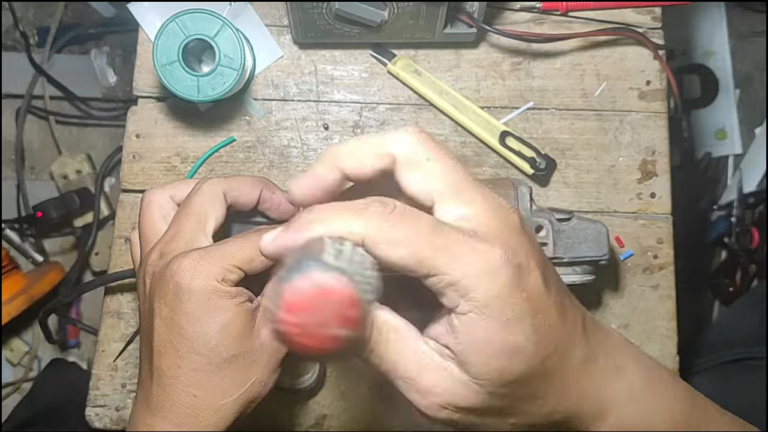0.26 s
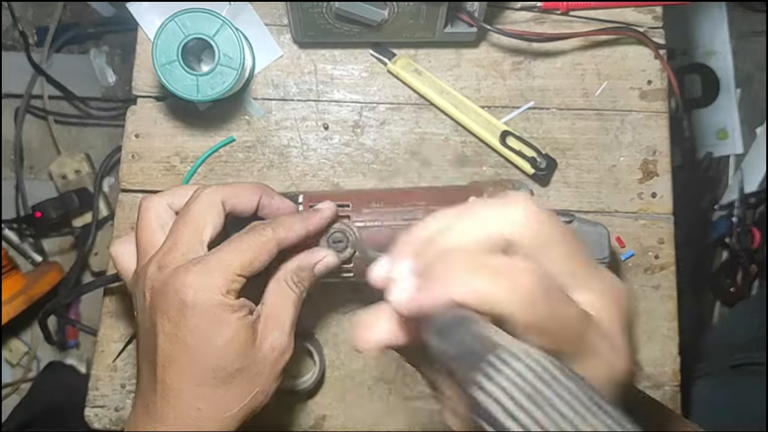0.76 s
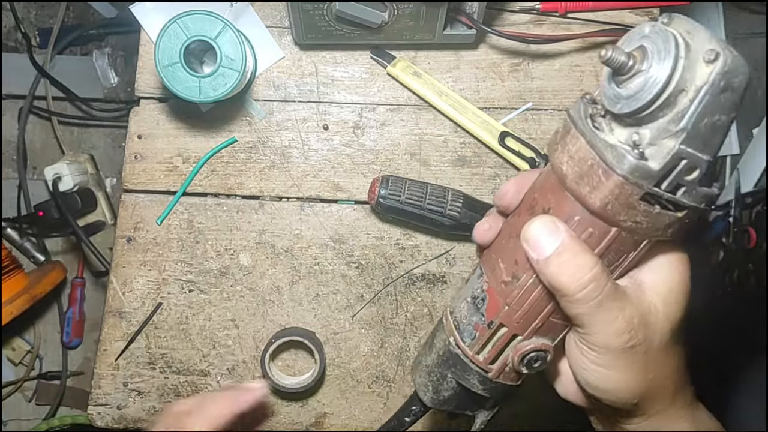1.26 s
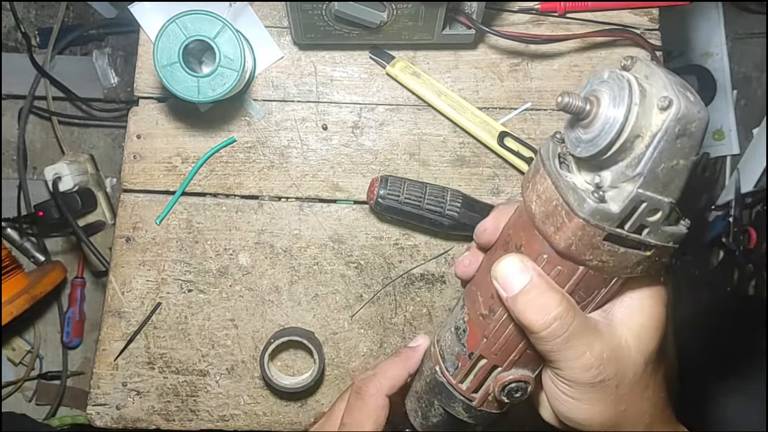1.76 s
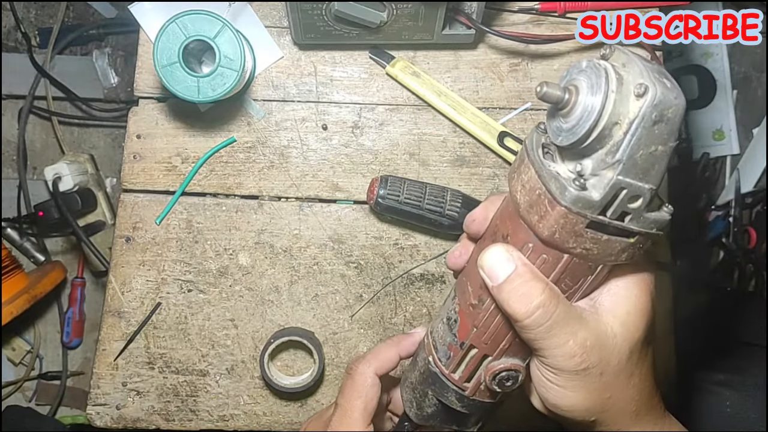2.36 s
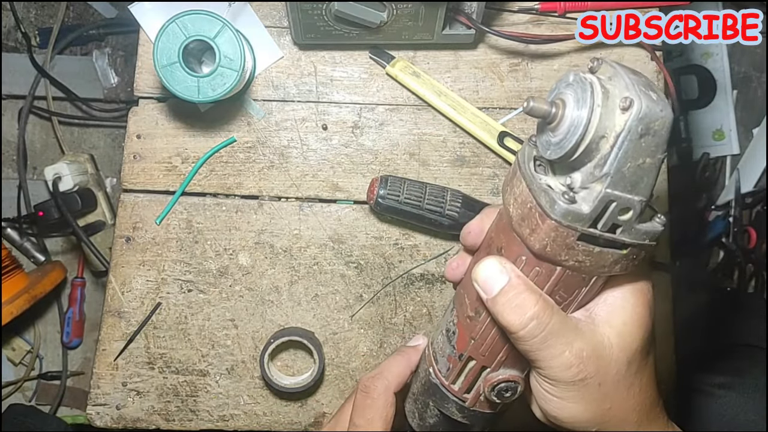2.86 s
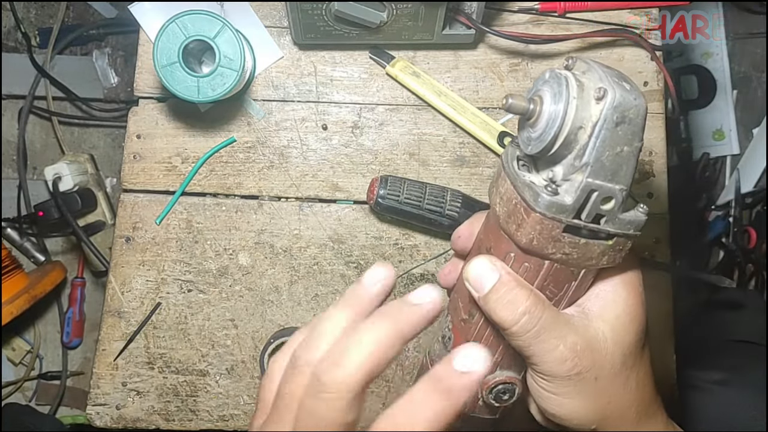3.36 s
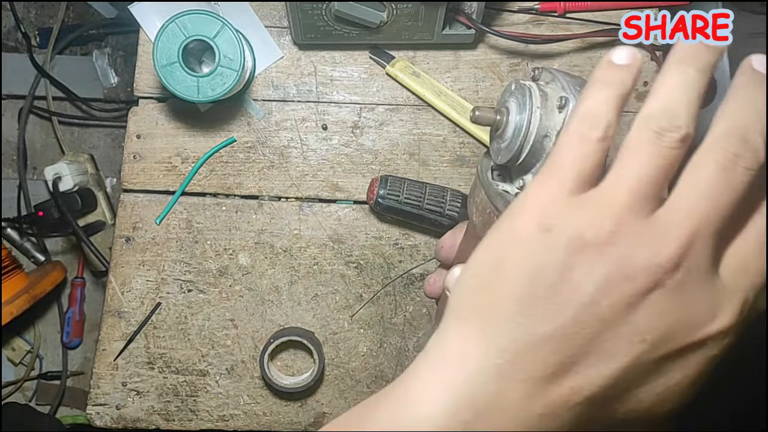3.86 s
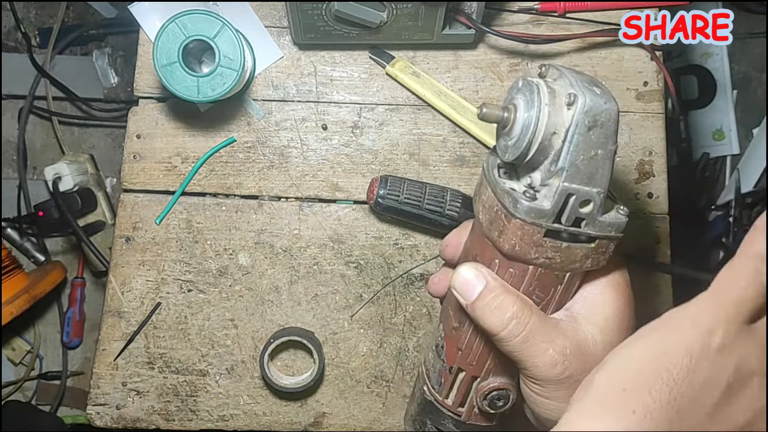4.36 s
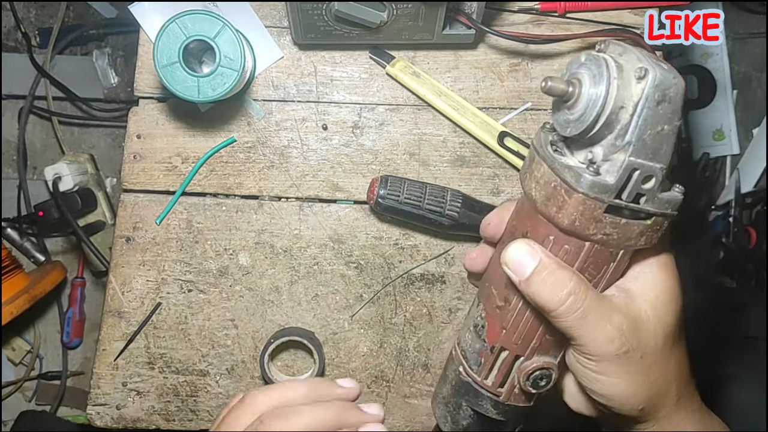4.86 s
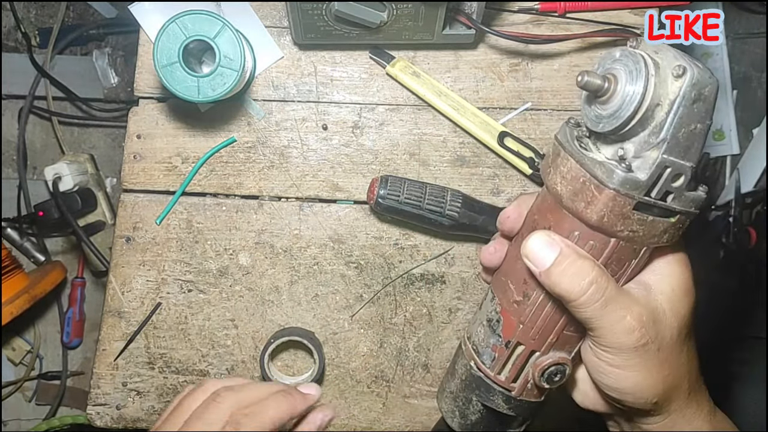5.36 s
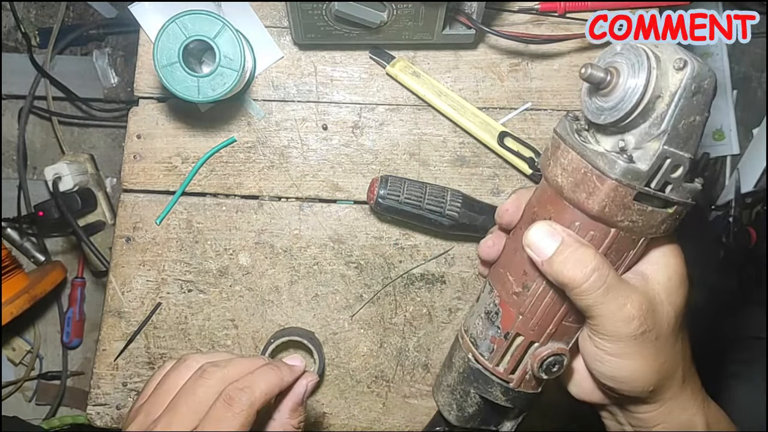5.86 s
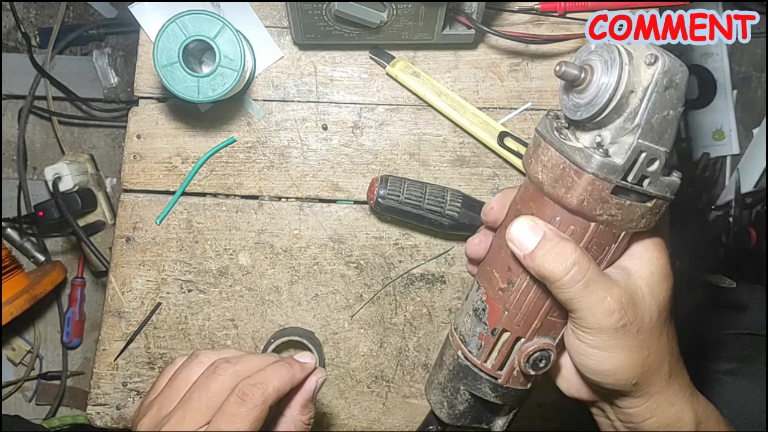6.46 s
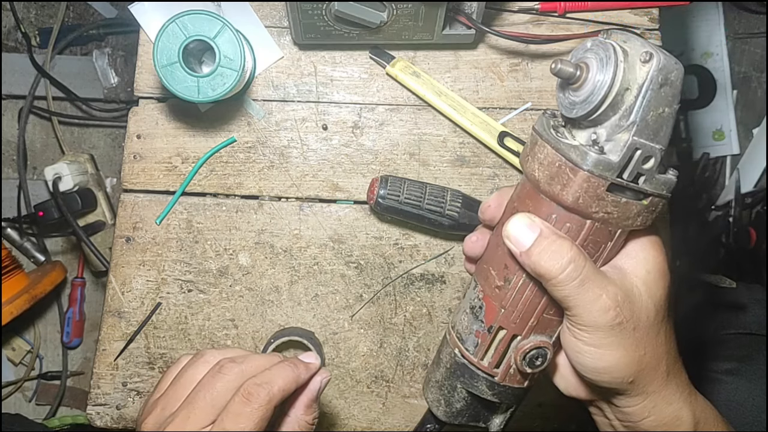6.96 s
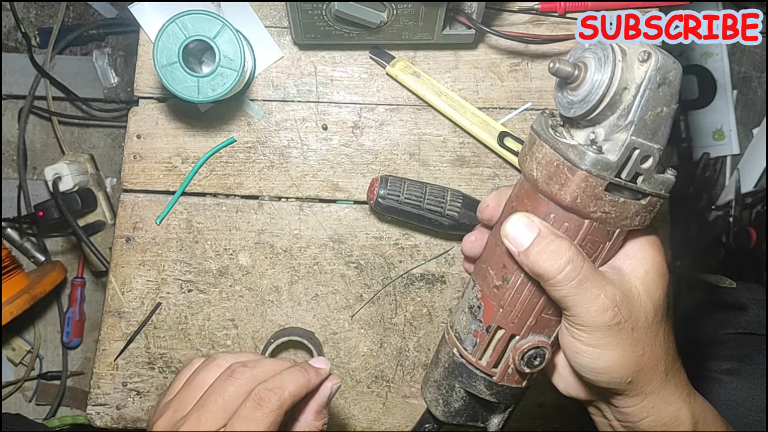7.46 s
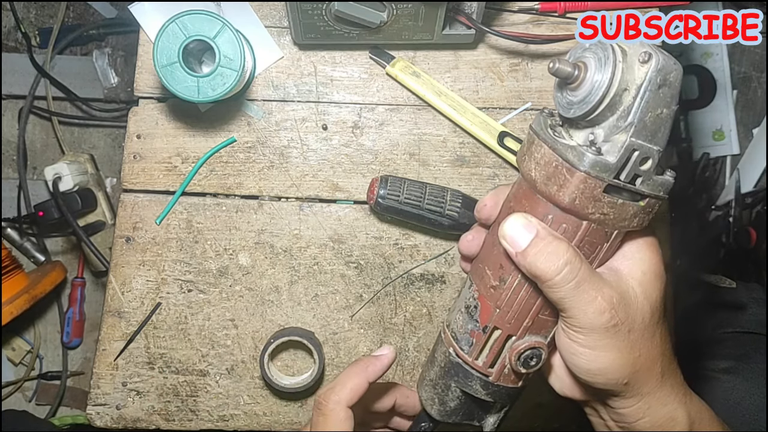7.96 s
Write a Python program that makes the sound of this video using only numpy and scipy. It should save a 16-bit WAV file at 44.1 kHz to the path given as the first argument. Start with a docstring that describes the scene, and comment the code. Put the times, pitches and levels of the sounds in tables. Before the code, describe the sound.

Distant rustling and soft hum at a workbench, suddenly quieter after one second. Then a bare angle grinder starts instantly, near the single microphone, with bright air hiss, brush fizz and gear rattle. Its rough whine sweeps up, slides down briefly, rises again and slowly settles. As the tool is turned, different overtones swell and fade; the noise turns hollow and duller while a hand passes. It never switches off.

```python
"""Workshop: a hand-held angle grinder without a disc is switched on above a bench, near one microphone.
The armature spins up, sags and climbs again; its multiples, rough sines locked to its turns, whine and swell
as the tool is turned in the hand. Brushes and cooling air hiss: filtered noise pulsed once a turn.
Before the start only quiet bustle, drone and squeaks, whose level fades and drops in one step."""
import sys
import numpy as np
from scipy import signal
from scipy.fft import rfft, irfft, next_fast_len
from scipy.io import wavfile
from scipy.ndimage import uniform_filter1d

SR = 44100
rng = np.random.default_rng(int(sys.argv[2]) if len(sys.argv) > 2 else 0)


def master_out(mix):
    """Clip the mix to full scale and print it as 16-bit PCM to the path in sys.argv[1]."""
    frames = np.transpose(np.atleast_2d(mix))
    ceiling = np.clip(frames, -1, 1)
    pcm = np.round(ceiling * 32767).astype(np.int16)
    wavfile.write(sys.argv[1], SR, pcm)


def volts_from_decibels(level):
    """Turn decibel levels (scalar or array-like) into linear amplitude factors."""
    exponent = np.asarray(level, float) / 20
    return 10 ** exponent


N = 362061
TIME = np.arange(N) / SR
START_S = 1.8725

# noise as the vents turn towards or away: (t/s, vent hiss level/dB, brush fizz level/dB, gear rush level/dB)
AIR = [(1.9, -29, -30, -36.5), (2.05, -36, -30.5, -40), (2.3, -30.5, -33.5, -36.5), (2.9, -34, -31.5, -39),
       (3.2, -31.5, -35, -36), (3.45, -35, -34.5, -39.5), (3.62, -34.5, -28.5, -36.5),
       (4.1, -40.5, -31, -36.5), (4.5, -45.5, -37, -42.5), (4.75, -44, -34.5, -42), (4.93, -33.5, -38, -37),
       (5.08, -45, -41, -48), (5.3, -44.5, -40, -39.5), (5.55, -42.5, -39, -43.5), (5.9, -39, -34.5, -36),
       (6.35, -39, -37.5, -40.5), (6.65, -42.5, -39.5, -41.5), (7.12, -44, -40.5, -46),
       (7.3, -38.5, -36, -40), (8.15, -39, -36.5, -39.5)]


def grinder():
    """The motor takes current at the switch: the noise is there within milliseconds."""
    turn = 2 * np.pi * np.cumsum(speed()) / SR
    unrest = unrest_of(turn)
    hiss_db, fizz_db, gear_db = columns(AIR)
    # the level climbs in equal dB steps while the contact closes
    switch_db = np.clip((TIME - START_S) * 4000, -60, 0)
    switch = volts_from_decibels(switch_db) * (TIME > START_S - 0.015)
    noises = past_hand(rush(turn, unrest, hiss_db, fizz_db, gear_db) + rattle(unrest))
    return switch * (whine(turn, unrest, hiss_db) + flutter(turn) + noises)


# run-up as a sum of exponential approaches, all starting at once: (speed missing at first f/Hz, time constant/s)
APPROACHES = [(193.9, .06), (211.1, .406), (82.0, 2.647)]
TOP_SPEED_HZ = 487.0
COAST_FROM_S, COAST_TO_S, BACK_AT_AGE_S = 2.525, 2.938, 0.32


def run_up_hz(age_s):
    """Armature speed closes in on the top speed as a sum of exponential approaches."""
    return TOP_SPEED_HZ - sum(hz * np.exp(-age_s / tau_s) for hz, tau_s in APPROACHES)


def speed():
    """Turns/s: run-up, even coasting as the current drops out, run-up resumed where the speeds match."""
    coast_ends_hz = [run_up_hz(COAST_FROM_S - START_S), run_up_hz(BACK_AT_AGE_S)]
    coast_hz = np.interp(TIME, [COAST_FROM_S, COAST_TO_S], coast_ends_hz)
    resumed_s = TIME - COAST_TO_S + BACK_AT_AGE_S
    age_s = np.where(TIME < COAST_FROM_S, TIME - START_S, resumed_s).clip(0)
    coasting = (TIME > COAST_FROM_S) & (TIME < COAST_TO_S)
    hz = np.where(coasting, coast_hz, run_up_hz(age_s))
    return uniform_filter1d(hz, 1500) + 0.4 * wander(3)


def unrest_of(turn):
    """How fast the speed is changing, 0 (steady) to 1 (spinning up or sagging)."""
    bend = uniform_filter1d(np.gradient(np.gradient(turn)), 3000)
    sweep_hz_per_s = uniform_filter1d(np.abs(bend), 8000) * SR ** 2 / (2 * np.pi)
    return np.tanh(sweep_hz_per_s / 60)


# multiples of the armature speed in the body whine
BODY_ORDERS = (1, 2, 3, 4)
# body whine as the tool is turned, before losses and wander: (t/s, level/dB of multiples 1, 2, 3, 4)
BODY = [(1.9, -72, -75, -63, -72), (2.02, -46, -49, -35, -28), (2.15, -34.5, -42.5, -35, -28.5),
        (2.3, -32, -39.5, -30, -27.5), (3.2, -32.5, -39, -30.5, -29), (3.45, -27, -32, -31.5, -24.5),
        (3.66, -27.5, -29, -36, -26), (4.04, -35.5, -37.5, -28.5, -21), (4.2, -31, -36.5, -12, -18),
        (4.5, -30, -32, -32, -19), (4.9, -33, -32, -30.5, -23), (5.12, -38.5, -41.5, -36, -15.5),
        (5.3, -35, -35, -53, -19), (5.62, -30, -35, -44, -18), (6.05, -34.5, -37, -51, -18),
        (6.3, -39, -37.5, -37, -19.5), (6.8, -44.5, -50.5, -46.5, -16.5), (7.05, -45, -38, -39.5, -16.5),
        (7.45, -38.5, -32.5, -60, -22), (7.7, -39, -37.5, -33.5, -20), (8.15, -37, -35, -43, -21.5)]
# brief dips of the whine, one list per body multiple: (t/s, length/s, depth/dB)
DIPS = [
    [],
    [(5.83, 0.31, -17)],
    [],
    [(4.63, 0.076, -12), (5.82, .2, -19.5), (7.55, .2, -2.5)],
]
# multiples in the gear, slot (12) and commutator bar (24) whine
TEETH_ORDERS = (6, 7, 9, 11, 12, 24)
# one row per teeth multiple, before wander: (level/dB added while the speed changes, steady level/dB)
TEETH = [(-43, -60), (-58, -61), (-55, -61), (-53, -59), (-51, -56), (-54, -55)]
# a multiple swells as the tool points it at the microphone, one list per teeth multiple: (t/s, length/s, level/dB)
SWELLS = [
    [(4.95, 0.23, -47), (5.85, .3, -40), (6.5, 0.35, -51.5), (7.0, 0.26, -44.5), (7.45, 0.33, -44.5),
     (7.85, 0.24, -47)],
    [(6.0, 0.33, -48), (6.38, 0.37, -37.5), (7.45, 0.32, -42)],
    [(4.2, 0.47, -46.5), (5.25, 0.22, -51), (6.3, 0.87, -49.5), (7.5, .2, -52.5), (8.05, 0.52, -51)],
    [(3.45, 0.23, -45), (3.95, 0.39, -44.5), (4.55, 0.35, -49), (5.35, 0.36, -43.5), (6.0, 0.38, -43)],
    [(3.5, 0.24, -48), (3.85, .8, -41.5), (4.55, 0.37, -44.5), (4.95, 0.75, -42), (5.75, 0.5, -38.5),
     (6.4, 0.65, -33), (7.9, 0.72, -46.5)],
    [(2.4, 0.69, -45), (3.85, 0.35, -44), (4.6, 0.34, -40.5), (4.95, 0.18, -40), (8.15, 0.27, -44)],
]
# faint rough tone between the multiples, before wander: (multiple, level/dB)
FAINT = [(2.5, -52)]
# multiples heard while the speed changes, before wander: (multiple, level over the hiss/dB)
RUN_UP = [(5, -10), (8, -17), (10, -18), (13, -19), (14, -19)]
# cooling fan and brush multiples at the vent resonance, before wander: (multiple, level over the hiss/dB)
VENT = [(36, -3), (38, -11), (39, -10)]
VENT_HZ, VENT_WIDTH_HZ = 14800, 1800


def whine(turn, unrest, hiss_db):
    """Multiples of the armature speed from body, teeth and vents, each with its own roughness."""
    hz = np.gradient(turn) * SR / (2 * np.pi)
    body = 0
    for k, db, dips in zip(BODY_ORDERS, columns(BODY), DIPS):
        # while the speed changes, the whine crosses many more resonances and stutters
        stutter_db = (0.63 + 2.0 * unrest ** 2) * wander(10)
        gain = volts_from_decibels(db + loss_db(k * hz, dips) + stutter_db)
        body = body + gain * tone(k * turn, rough_db=-21.0, rough_hz=79.0)

    # play in the gears shifts the timing, which smears the higher multiples most
    loose = turn + (0.0058 + 0.063 * unrest) * wander(20)
    teeth = 0
    for k, (early_db, db), swells in zip(TEETH_ORDERS, TEETH, SWELLS):
        gain = volts_from_decibels(early_db) * unrest ** 5 + volts_from_decibels(db) + bells(swells)
        fading = volts_from_decibels((1.5 + 3.15 * unrest) * wander(9.1))
        teeth = teeth + gain * fading * tone(k * loose, rough_db=-9.5, rough_hz=162)

    faint = sum(volts_from_decibels(db + 4 * wander(3)) * tone(k * turn, rough_db=-8, rough_hz=30) for k, db in FAINT)
    run_up = sum(volts_from_decibels(hiss_db + db + 3.7 * wander(20.0)) * tone(k * turn, rough_db=-5.5, rough_hz=80)
                 for k, db in RUN_UP)
    vent = 0
    for k, db in VENT:
        resonance = 1 / (1 + ((k * hz - VENT_HZ) / VENT_WIDTH_HZ) ** 2)
        gain = volts_from_decibels(hiss_db + db + 1.6 * wander(6.3)) * resonance
        vent = vent + gain * tone(k * turn, rough_db=-20, rough_hz=100)
    emerge = np.clip((TIME - START_S) / 0.18, 0, 1) ** 2
    return body + emerge * (teeth + faint + unrest ** 2 * run_up + vent)


# pitches at which casing, bench and room cancel a tone: (f/Hz, width/Hz, depth/dB)
DEAD = [(321.5, 10, -8), (369, 7.9, -3), (387.5, 2.3, -5), (708, 4.3, -11), (730, 6, -6), (792, 19, -9),
        (970, 22, -3.5), (1087, 12, -3.5), (1168, 7.9, -13), (1243, 33, -0.5), (1314.3, 15.4, -18),
        (1362, 5.1, -13.5), (1555, 25, -11.5), (1638, 14, -12)]


def loss_db(hz, dips):
    """What a tone loses at the dead pitches and in its brief dips."""
    grid_hz = np.arange(2000.)
    dead = sum(db * np.exp(-((grid_hz - dead_hz) / width_hz) ** 2) for dead_hz, width_hz, db in DEAD)
    dip = sum(db * np.exp(-((TIME - s) / length_s * 2) ** 2) for s, length_s, db in dips)
    return np.interp(hz, grid_hz, dead) + dip


# side tones: (t/s, common level/dB at multiple 1, upper level/dB at multiple 4, lower level/dB at multiple 4)
FLUTTER = [(3.3, -65, -57, -60), (3.6, -49, -47, -62), (4.0, -56, -60, -59), (4.5, -61, -56, -47),
           (4.8, -45, -48, -47), (5.75, -36.5, -38, -49), (6.0, -47.5, -66, -44), (6.2, -72, -41, -48),
           (7.2, -72, -47, -59), (7.5, -66, -38, -61), (8.2, -70, -42, -52)]
FLUTTER_HZ = 83.3


def flutter(turn):
    """An even flutter gives the first and fourth multiple side tones, spaced by its rate."""
    beat = 2 * np.pi * FLUTTER_HZ * TIME
    first_db, upper_db, lower_db = columns(FLUTTER)
    # (side tone, peak over the common level/dB): upper, lower, second upper
    first = sum(volts_from_decibels(db) * np.sin(turn + k * beat) for k, db in ((1, 2.0), (-1, -11), (2, -10.0)))
    upper = volts_from_decibels(upper_db) * np.sin(4 * turn + beat)
    lower = volts_from_decibels(lower_db) * np.sin(4 * turn - beat)
    return volts_from_decibels(first_db) * first + np.sqrt(2) * (upper + lower)


# noise colours, scaled to rms 1 when played: (f/Hz, relative level/dB per Hz)
HISS = [(4500, -57), (6000, 1.5), (7500, 5), (10000, 1), (11500, -0.5), (13000, -2)]
FIZZ = [(9000, -1), (11000, -0.5), (12500, 5), (14000, 6.5), (15500, 4.5), (17000, -27)]
GEAR = [(2800, -54), (3400, 1.5), (4200, 8), (5500, 7), (6300, 5.5), (8000, -41)]
CASING = [(150, -17), (300, -6), (600, -1), (1200, 7), (1800, 5.5), (2600, 4), (3200, 8.5), (4000, -11)]
RUMBLE = [(20, 0), (50, -2), (100, -3), (190, -2.5), (400, -5)]
BRIGHT = [(12800, -20), (13600, -5), (14400, 4), (15300, -7), (16000, -20)]  # bright band of vent noise in the first seconds
STIR = [(20, -4), (60, -6), (110, -6), (190, -0.5), (300, -3), (450, -20)]  # draught
# the waving hand stirs the air: (t/s, length/s, level/dB)
DRAUGHT = [(3.8, 0.49, -47.5), (4.25, 0.64, -48.5)]
CASING_DB, CASING_FOLLOWS = -39, 0.51  # level when the hiss is at -40.5 dB; dB per dB of hiss
RUMBLE_EARLY_DB, RUMBLE_DB = -64.5, -56.5  # at unrest 1; at steady speed
BRIGHT_DB, BRIGHT_UNTIL_S = -31.5, 3.55  # fades around this time


def rush(turn, unrest, hiss_db, fizz_db, gear_db):
    """Air and brush noise in seven parts, pulsed once a turn."""
    pulse = (1 + 0.023 * np.cos(turn)) * volts_from_decibels(0.74 * wander(20))
    casing = volts_from_decibels(CASING_DB + CASING_FOLLOWS * (hiss_db + 40.5))
    rumble = volts_from_decibels(RUMBLE_DB + (RUMBLE_EARLY_DB - RUMBLE_DB) * unrest)
    bright = volts_from_decibels(BRIGHT_DB) / (1 + np.exp((TIME - BRIGHT_UNTIL_S) / 0.15))
    shapes = (HISS, FIZZ, GEAR, CASING, RUMBLE, BRIGHT, STIR)
    gains = (volts_from_decibels(hiss_db), volts_from_decibels(fizz_db), volts_from_decibels(gear_db), casing, rumble, bright, bells(DRAUGHT))
    return pulse * sum(gain * volts_from_decibels(1.0 * wander(11.4)) * noise(shape) for shape, gain in zip(shapes, gains))


# rattle colour: (f/Hz, relative level/dB per Hz)
JOLT = [(1000, -20), (1900, -7), (2500, -8), (3300, 0), (4500, -8), (10000, -18)]
MAINS_BEAT_HZ = 99.7  # twice the mains


def rattle(unrest):
    """Gears rattle while the speed changes; the starting current shakes them in bursts at twice the mains."""
    since_s = (TIME - START_S).clip(0)
    swell = np.clip(since_s / 0.025, 0, 1) * np.exp(-since_s / 0.16)
    bursts = swell * np.cos(np.pi * MAINS_BEAT_HZ * (TIME - 1.882)) ** 4
    gain = volts_from_decibels(-25) * bursts + volts_from_decibels(-38.5) * unrest
    return gain * volts_from_decibels(1.5 * wander(30)) * noise(JOLT)


# hand passing the tool: (t/s, extra path/ms, echo share/0-1, share taken from low treble/0-1, from top/0-1)
HAND = [(3.3, 0.34, 0.12, 0, 0), (3.5, 0.31, 0.54, 0.5, 0.3), (3.75, 0.31, 0.46, .7, 0.5),
        (4.0, 0.31, 0.5, 0.5, 0.4), (4.1, 0.302, 0.4, 0.2, 0.7), (4.4, 0.31, 0.4, 0.76, 0.65),
        (4.72, 0.26, 0.4, 0.7, 0.45), (4.9, 0.386, 0, 0.7, 0)]
# the two shaded bands: (lower edge f/Hz, upper edge f/Hz)
SHADED_HZ = [(2350, 3300), (12300, 17000)]


def past_hand(sound):
    """The noise and its inverted echo off the hand hollow each other out; the hand shades two bands."""
    path_ms, share, *shades = columns(HAND)
    echo = np.interp(TIME - path_ms / 1000, TIME, sound)
    out = sound - share.clip(0, 1) * echo
    shaded = out
    for shade, band_hz in zip(shades, SHADED_HZ):
        sos = signal.butter(2, band_hz, "band", fs=SR, output="sos")
        shaded = shaded - shade.clip(0, 1) * signal.sosfiltfilt(sos, out)
    return shaded


# noise colours of bustle, rustle and drone: (f/Hz, relative level/dB per Hz)
SHOP_MID = [(150, -2.5), (200, -9), (400, -4), (700, -8), (1500, -6.5), (2400, -14), (3500, -20),
            (9000, -28.5)]
SHOP_TOP = [(3000, -18), (6000, -3.5), (10000, 2.5), (14000, 7.5), (16000, 3)]
SHOP_BASS = [(20, -3), (60, 4), (160, 2), (220, -28)]
# hum: (f/Hz, carrier level over the drone gain/dB)
HUM = [(50, -10), (107, -7), (151, -13)]
# bustle swells, before wander: (t/s, length/s, level/dB)
SURGES = [(.02, 0.11, -52), (.34, 0.19, -56), (1.1, 0.11, -63), (1.43, 0.47, -63.5)]
# treble swells: (t/s, length/s, level/dB)
RUSTLES = [(.55, 0.052, -62), (1.39, 0.075, -64)]
# faint scratchy tones: (t/s at the middle, length/s, f/Hz, carrier level/dB without its noisy skirt)
SQUEAKS = [(1.085, 0.062, 309, -75), (1.142, 0.082, 1200, -80), (1.404, 0.11, 634, -78),
           (1.393, .07, 4500, -83), (1.53, 0.11, 5200, -84), (1.67, 0.18, 285, -79)]
SHOP_DB, SHOP_FADE_DB_PER_S, STEP_S, STEP_DB = -51, -1.5, 0.94, -12.5
SHOP_TOP_DB = -9  # over the bustle
SHOP_BASS_DB, DRONE_FADE_DB_PER_S, BASS_STEP_DB = -4, -4, 1.5  # over the bustle


def workshop():
    """Distant bustle with an uneven level, rustle of hands, a low drone and a few squeaks."""
    stepped = TIME > STEP_S
    level = volts_from_decibels(SHOP_DB + SHOP_FADE_DB_PER_S * TIME + STEP_DB * stepped)
    surges = bells(SURGES)
    hum = sum(volts_from_decibels(db) * tone(2 * np.pi * hz * TIME, rough_db=-5.0, rough_hz=2.1) for hz, db in HUM)
    drone_gain = level * volts_from_decibels(SHOP_BASS_DB + DRONE_FADE_DB_PER_S * TIME + BASS_STEP_DB * stepped)
    drone = drone_gain * (volts_from_decibels(-2.5) * noise(SHOP_BASS) + hum)
    bustle = (level + surges) * volts_from_decibels(0.91 * wander(18)) * noise(SHOP_MID)
    rustle_gain = volts_from_decibels(SHOP_TOP_DB) * (level + 0.65 * surges) + bells(RUSTLES)
    rustle = rustle_gain * noise(SHOP_TOP)
    squeaks = sum(bells([(s, length_s, db)]) * tone(2 * np.pi * hz * TIME, rough_db=12.0, rough_hz=hz / 25)
                  for s, length_s, hz, db in SQUEAKS)
    return squeaks + bustle + rustle + drone


def tone(phase, rough_db, rough_hz):
    """A sine of rms 1 plus a noisy skirt: no two turns are quite alike in size and timing."""
    skirt = volts_from_decibels(rough_db) * (wander(rough_hz) + 1j * wander(rough_hz))
    carrier = np.exp(1j * (phase + 2 * np.pi * rng.random()))
    return np.sqrt(2) * np.imag((1 + skirt) * carrier)


def noise(shape):
    """Noise coloured by (f/Hz, relative level/dB per Hz) points, rms 1."""
    hz, db = np.transpose(shape)
    size = next_fast_len(N)
    f = np.arange(size // 2 + 1) * SR / size + 1  # +1 Hz keeps the log finite
    gain = volts_from_decibels(np.interp(np.log(f), np.log(hz), db, left=-80, right=-80))
    return unit(irfft(gain * rfft(rng.standard_normal(size)), size)[:N])


def wander(hz):
    """Smooth chance that changes about hz times a second, rms 1."""
    pole = np.exp(-2 * np.pi * hz / SR)
    return unit(signal.lfilter([1], [1, -2 * pole, pole ** 2], rng.standard_normal(N)))


def bells(events):
    """Gain of a list of (t/s, length/s, level/dB) swells."""
    return sum(volts_from_decibels(db) * np.exp(-((TIME - s) / length_s * 2) ** 2) for s, length_s, db in events)


def columns(table):
    """Every column of a (t/s, value, ..) table, one value per sample."""
    s, *values = np.transpose(table)
    return np.array([np.interp(TIME, s, v) for v in values])


def unit(x):
    """Scale to rms 1."""
    return x / np.sqrt(np.mean(np.abs(x) ** 2))


def scene():
    """One microphone feeds both channels."""
    return np.tile(grinder() + workshop(), (2, 1))


def roll_off(x):
    """The treble ends steeply here."""
    return signal.sosfilt(signal.butter(12, 16370, fs=SR, output="sos"), x)


TOP_HZ = 15480


def record(dry):
    """The recorder cuts the top steeply with an elliptic low-pass."""
    low_pass = signal.ellip(10, 0.2, 60, TOP_HZ, fs=SR, output="sos")
    mix = signal.sosfilt(low_pass, dry)
    return roll_off(mix)


dry = scene()
out = record(dry)
master_out(out)
```